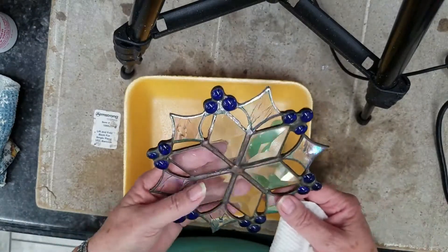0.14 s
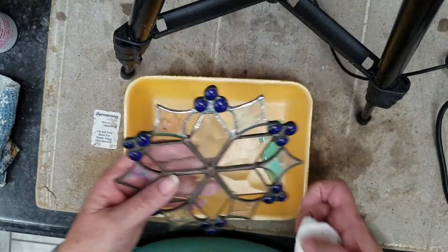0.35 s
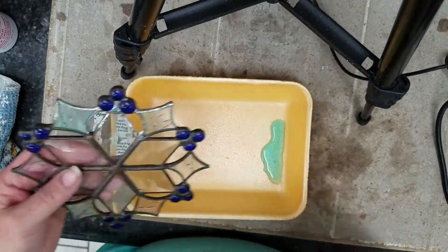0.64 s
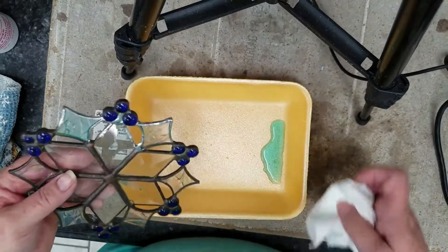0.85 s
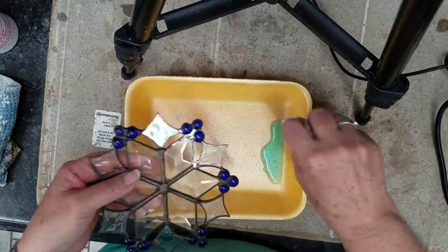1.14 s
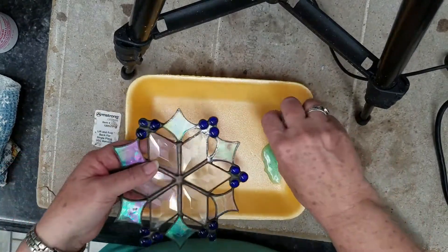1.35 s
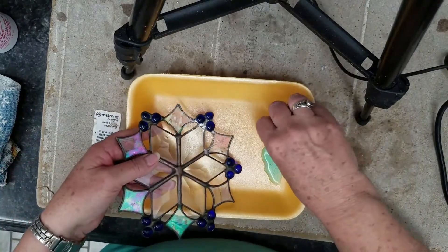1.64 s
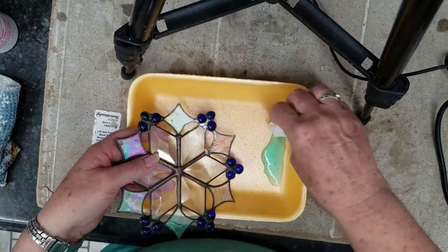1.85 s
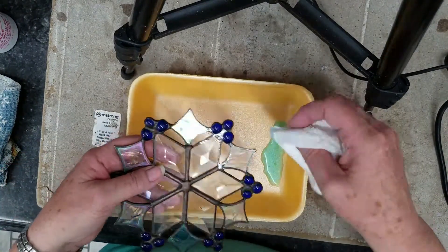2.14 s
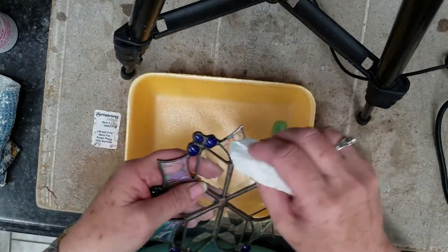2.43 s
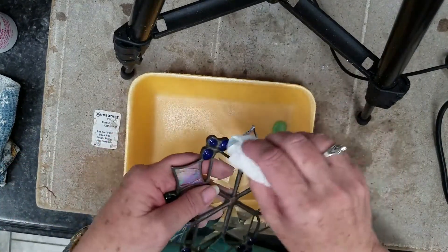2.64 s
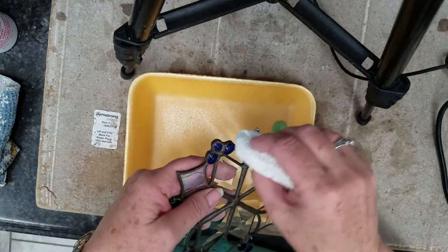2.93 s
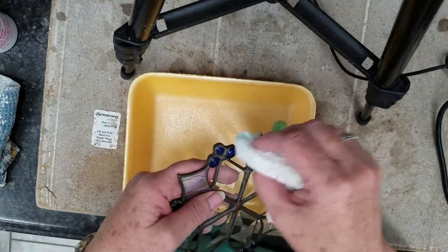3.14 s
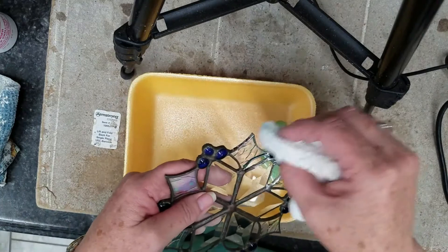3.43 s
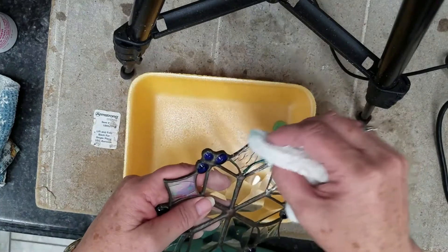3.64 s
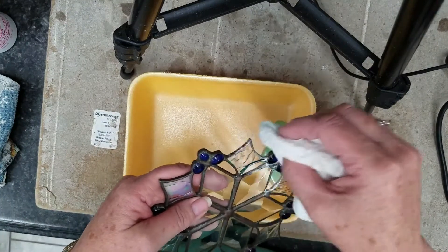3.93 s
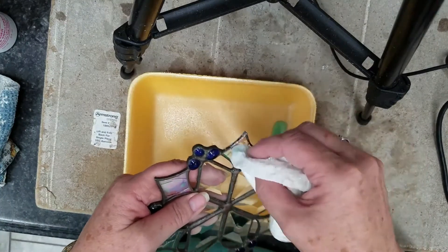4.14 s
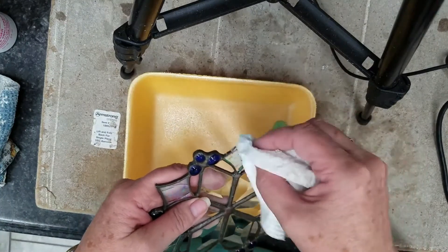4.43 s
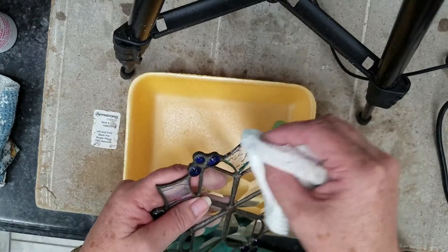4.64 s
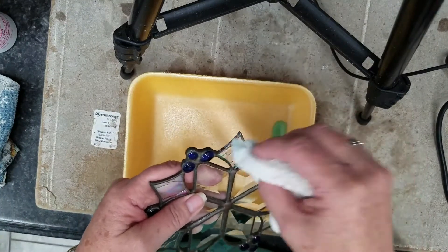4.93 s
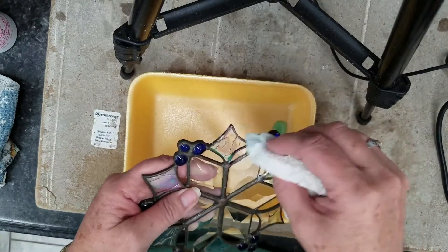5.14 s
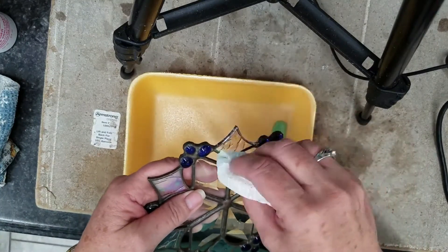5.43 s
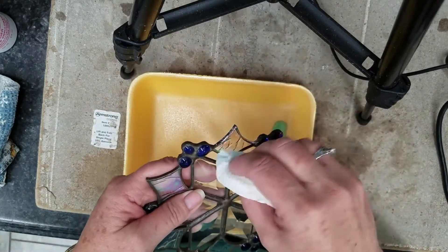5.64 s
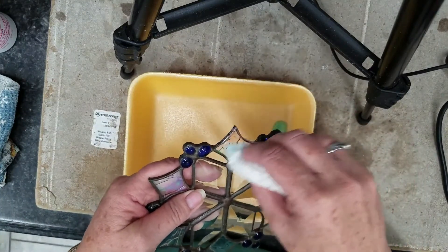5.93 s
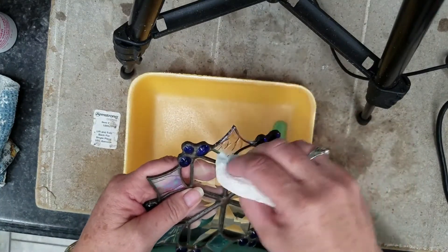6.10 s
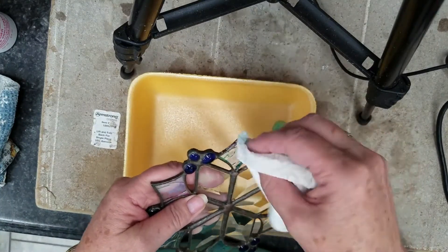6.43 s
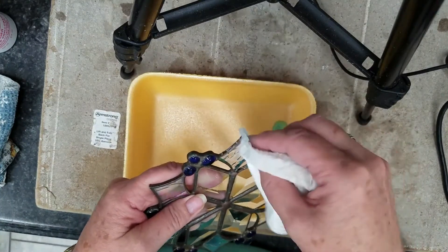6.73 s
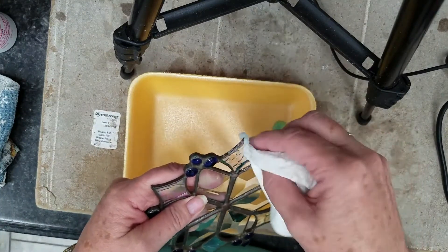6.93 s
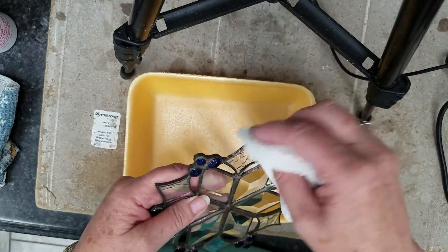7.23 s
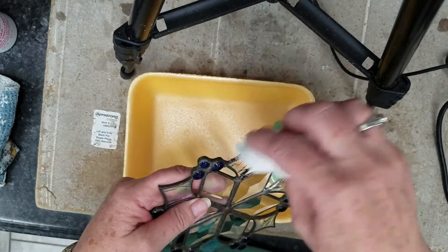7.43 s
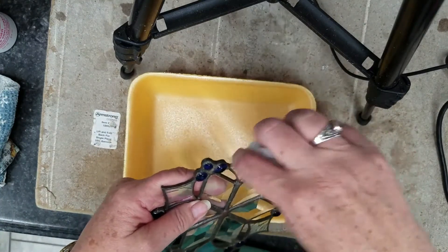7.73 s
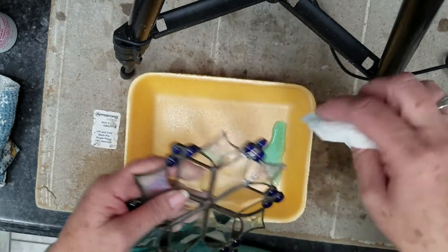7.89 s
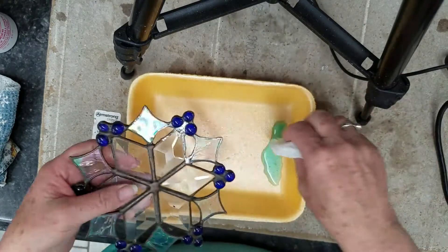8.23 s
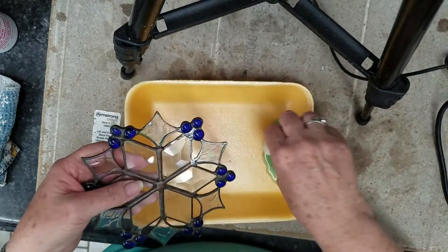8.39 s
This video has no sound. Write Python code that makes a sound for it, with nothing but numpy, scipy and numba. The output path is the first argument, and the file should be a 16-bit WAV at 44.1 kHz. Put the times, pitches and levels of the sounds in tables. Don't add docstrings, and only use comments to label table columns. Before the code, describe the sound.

A small quiet indoor workspace, heard very close in stereo, with a low steady fridge-like hum, slightly throbbing, and soft air hiss throughout. From 0 to 0.5 s there are light paper scuffs and small bumps; at 0.5-1.0 s the paper towel crumples with crisp crackling and a stronger scuff near 0.8. Between 1.1 and 2.0 s come the loudest moves: dry dabs and scrapes against a foam tray, sharp snaps and a hollow knock at 1.3, a bright crack at 1.84 and a dull bump at 2.0. It nearly quiets until 2.7. From 2.7 to 7.7 s, softer short scratchy rubs cross the leaded glass, irregular at first, quick and even around 5.2-6.0, with seam ticks and little knocks. After a brief lull, scuffs at 8.0 and 8.25 lead to a tight cluster of glassy ticks and a brighter paper scrape around 8.3-8.5.

```python
import sys
import numpy as np
from scipy import signal
from scipy.fft import rfft, irfft, next_fast_len
from scipy.io import wavfile
from scipy.ndimage import uniform_filter1d, map_coordinates
from numba import njit

SR = 44100
rng = np.random.default_rng(int(sys.argv[2]) if len(sys.argv) > 2 else 0)


def nominal_scale(level):
    x = np.asarray(level, float) / 20
    return 10 ** x


def bounce(signal):
    frames = np.transpose(np.atleast_2d(signal))
    limited = np.clip(frames, -1, 1)
    pcm = np.round(limited * 32767).astype(np.int16)
    wavfile.write(sys.argv[1], SR, pcm)


N = 377496
WIDE = next_fast_len(N, True)
TIME = np.arange(N) / SR
HZ = np.maximum(np.fft.rfftfreq(WIDE, 1 / SR), 1)


def along(table):
    hz, value = np.transpose(table)
    return np.interp(np.log(HZ), np.log(hz), value)


def unit(x):
    return x / np.sqrt(np.mean(x ** 2))


def lean_to(db):
    return nominal_scale(np.array([[db], [-db]]) / 2)


# f/Hz, correlation [0 to 1]
PORT_LIKENESS = [(60, 1), (130, 0.99), (290, 0.77), (640, 0.57), (1400, 0.15), (3100, 0.012), (6800, .01)]
# f/Hz, left minus right level/dB
PORT_LEAN = [(60, -7.5), (110, -1), (200, -2), (380, -1), (700, -3), (1290, -2.5), (2380, -1.5),
             (4400, -0.5), (8120, -0.5), (15000, 1.0)]


def ports(near, other, db):
    alike = np.clip(along(PORT_LIKENESS), 0, .999)
    mid = rfft(near, WIDE) * np.sqrt(1 + alike)
    side = rfft(other, WIDE) * np.sqrt(1 - alike)
    lean = along(PORT_LEAN) / 2
    left = (mid + side) * nominal_scale(db + lean)
    right = (mid - side) * nominal_scale(db - lean)
    return unit(irfft(np.array([left, right]), WIDE)[:, :N])


def walk(rate):
    k = int(SR / rate)
    steps = np.repeat(rng.standard_normal(N // k + 1), k)
    return 1.36 * uniform_filter1d(uniform_filter1d(steps, k), k)[:N]


@njit
def resonate(x, hz, width):
    y, band, low = np.empty(len(x)), 0., 0.
    for i in range(len(x)):
        g, k = np.tan(np.pi * hz[i] / SR), width / hz[i]
        v = (band + g * (x[i] - low)) / (1 + g * (g + k))
        band, low, y[i] = 2 * v - band, low + 2 * g * v, k * v
    return y


def slips(per_second, scatter_db):
    moment, luck, sign = rng.random((3, N))
    size = nominal_scale(-scatter_db * np.log(luck + .008))
    return unit((moment < per_second / SR) * size * np.sign(sign - .5))


def creases(count):
    out = np.zeros((2, N))
    r = np.exp(-np.pi * 350 / SR)
    for hz in np.geomspace(1490, 3630, count):
        pops = slips(350, 1.9) * nominal_scale(3.3 * walk(45))
        ring = unit(signal.lfilter([1, 0, -1], [1, -2 * r * np.cos(2 * np.pi * hz / SR), r * r], pops))
        lag = rng.integers(-2, 4)
        out += np.array([ring, np.roll(ring, lag)]) * min(1, 2800 / hz) ** 2.8
    return unit(out)


def mottle(x, patchy_db):
    patch_hz, patch_ms = 700, 35
    hz, t, z = signal.stft(x, SR, nperseg=256)
    field = rng.standard_normal((120, 900))
    row, column = np.minimum(hz / patch_hz, 119), np.minimum(1000 * t / patch_ms, 899)
    place = np.meshgrid(row, column, indexing="ij")
    z = z * nominal_scale(patchy_db * map_coordinates(field, place, order=1))
    return unit(signal.istft(z, SR, nperseg=256)[1][:, :N])


# peak t/s, slide t/ms, hiss level/dB, body level/dB
CATCHES = [(.778, 27, -47, -45.5), (.75, 20, -48, -56), (1.39, 8, -53, -61), (1.458, 8.9, -42.5, -44.5),
           (2.009, 36, -61.5, -74), (2.545, 14, -68, -68), (2.872, 19, -61.5, -62.5),
           (3.012, 21, -57, -57.5), (3.154, 33, -63.5, -69), (3.522, 13, -61.5, -64), (3.792, 13, -63, -64),
           (4.098, 69, -60, -59), (4.398, 15, -59, -61), (4.676, 98, -56, -58), (4.969, 71, -53.5, -55),
           (6.28, 12, -67, -76), (6.474, 60, -57, -55.5), (7.296, 45, -57, -56), (7.666, 20, -55, -58.5),
           (7.853, 20, -61, -80), (7.893, 42, -59.5, -61.5), (8.247, 120, -57, -57.5)]
# peak t/s, run-up t/ms, hiss level/dB, body level/dB
SWEEPS = [(.317, 27, -58.5, -52.5), (1.655, 69, -52, -50.5), (2.727, 58, -57.5, -57.5),
          (3.632, 60, -60, -60), (3.906, 42, -61, -60.5), (4.795, 31, -53.5, -54.5), (5.743, 38, -55, -56),
          (5.958, 28, -53.5, -55), (6.423, 49, -56.5, -55), (6.674, 47, -56, -57.5), (6.811, 24, -57, -58),
          (7.053, 130, -62.5, -61), (7.247, 24, -62.5, -62), (7.474, 18, -58.5, -59.5),
          (7.621, 12, -60.5, -60.5)]
# peak t/s, slide t/ms, hiss level/dB, body level/dB
JOLTS = [(1.153, 14, -50, -50.5), (1.314, 31, -46, -48), (1.446, 8, -46, -47.5), (4.111, 11, -56, -59),
         (5.374, 15, -69, -68), (5.396, 20, -60, -67), (5.591, 18, -60, -67), (6.034, 52, -55.5, -56.5),
         (8.004, 22, -58, -64), (8.231, 8, -59, -60), (8.321, 42, -50.5, -53)]
# peak t/s, half length t/ms, hiss level/dB, body level/dB
RUBS = [(.226, 25, -58, -55), (.945, 28, -50, -55.5), (1.062, 27, -58, -60.5), (1.214, 34, -48.5, -48.5),
        (1.839, 39.5, -47.5, -51), (2.257, 43, -69, -62.5), (2.38, 26, -64.5, -60.5),
        (3.264, 25, -56.5, -59.5), (4.495, 41, -60, -61), (5.21, 31.7, -55, -59),
        (5.305, 28.6, -58.5, -59.5), (5.417, 34, -57.5, -61), (5.522, 26, -52, -56.5),
        (5.616, 31, -56, -58.5), (5.85, 35, -57, -58), (6.916, 18.6, -52.5, -51), (8.404, 25, -45.5, -49.5),
        (8.518, 27, -56, -54.5), (.39, 31, -59, -55), (1.98, 20, -63, -72), (2.965, 28, -60.5, -68),
        (4.21, 19, -62.5, -68), (4.6, 35, -67, -67), (5.995, 33, -62, -70), (6.14, 12, -62, -63),
        (6.745, 30, -61, -61), (7.4, 27, -62.5, -65), (8.05, 30, -71, -75), (7.72, 34, -62.5, -61.5)]


def strokes():
    catch_ms, stop_ms, jolt_ms = 8.3, 17.3, 1.5
    rows = [(s, catch_ms, ms, *db) for s, ms, *db in CATCHES]
    rows += [(s, ms, stop_ms, *db) for s, ms, *db in SWEEPS]
    rows += [(s, jolt_ms, ms, *db) for s, ms, *db in JOLTS]
    rows += [(s, ms, ms, *db) for s, ms, *db in RUBS]
    return np.array(sorted(rows))


# t/s, level/dB
RUSTLE = [(0.0, -72.5), (.27, -76), (.53, -50), (.625, -53), (.75, -50), (.875, -54.5), (1.0, -73),
          (1.375, -49.5), (1.625, -58), (1.77, -57), (1.875, -75), (2.0, -62.5), (2.5, -71.5), (4.2, -73),
          (5.2, -82), (6.75, -71.5), (7.5, -67), (8.56, -75.5)]


def pressure(column):
    coarse = TIME[::32]
    rustle_db = np.interp(coarse, *np.transpose(RUSTLE)) + 0.16 * (column == 2)
    power = nominal_scale(2 * rustle_db)
    for row in strokes():
        lag_ms = 1000 * (coarse - row[0])
        swell = np.exp(-(lag_ms / np.where(lag_ms < 0, row[1], row[2])) ** 2)
        power += nominal_scale(2 * row[2 + column]) * swell
    return np.interp(TIME, coarse, np.sqrt(power))


# f/Hz, level/dB per Hz
PAPER_HISS = [(2500, -12.5), (4000, -4.5), (5200, -4.5), (7000, -7.5), (9000, -2.5), (12000, -1.5),
              (15500, -0.5), (17000, -0.5)]
# f/Hz, level/dB per Hz
PAPER_BODY = [(150, -39), (350, 0), (700, 4), (1000, 2), (1300, -5), (1700, -2), (2600, -1.5), (3600, -2),
              (4600, -10), (7000, -44)]
# f/Hz, width f/Hz, level/dB
GLASS_MODES = [(990, 38, 1), (1257, 116, 12), (1600, 42, 11), (2083, 63, 4), (2550, 37, -35),
               (3180, 87, -10)]


def towel():
    grip_db = 1.3 * walk(80)
    hiss = ports(slips(7000, 2.1), slips(7000, 2.4), along(PAPER_HISS))
    glass = sum(nominal_scale(db) / (1 + ((HZ - hz) / (width / 2)) ** 2) for hz, width, db in GLASS_MODES)
    body_db = along(PAPER_BODY) + 20 * np.log10(1 + 0.43 * glass)
    body = ports(slips(4000, 1.1), slips(4000, 2.0), body_db)
    peaks = strokes()[:, 0]
    dull = np.array([row for row in SNAPS + TAPS if row[2] < 2700], float)
    pitches = dull[np.abs(peaks[:, None] - dull[:, 0]).argmin(axis=1), 2]
    pocket_hz = pitches[np.searchsorted((peaks[1:] + peaks[:-1]) / 2, TIME)]
    pocket = np.array([resonate(side, pocket_hz, 350.) for side in body])
    body = unit(body + 0.57 * pocket + 0.63 * creases(count=11))
    hiss, body = mottle(hiss, patchy_db=2.8), mottle(body, patchy_db=2.1)
    hiss = hiss * pressure(1) * nominal_scale(1.0 + grip_db)
    return hiss + body * pressure(2) * nominal_scale(-2.26 + grip_db + 0.48 * walk(30))


MAINS_HZ, SHAFT_HZ = 59.985, 58.352
# t/s, level/dB
HUM_SWELL = [(0.0, -40.5), (.2, -45), (.55, -40), (.9, -43.5), (1.85, -41.5), (2.07, -45.5), (2.3, -40.5),
             (2.75, -44), (3.4, -42), (4.1, -40.5), (5.0, -42.5), (5.3, -41), (5.6, -45), (6.2, -42),
             (6.95, -43.5), (7.3, -39), (7.58, -45), (8.0, -40.5)]


def hum():
    late = TIME - 0.01057
    mains = nominal_scale(np.interp(TIME, *np.transpose(HUM_SWELL))) * np.cos(2 * np.pi * MAINS_HZ * late)
    shaft = nominal_scale(-72) * np.cos(2 * np.pi * SHAFT_HZ * late)
    return np.sqrt(2) * nominal_scale(np.array([[-2.2], [1.8]])) * (mains + shaft)


# multiple, level/dB, left minus right level/dB
MAINS_LINES = [(2, -58, -1), (3, -72.5, 6.5), (4, -78.5, -16.5)]
# multiple, level/dB, left minus right level/dB
SHAFT_LINES = [(2, -58.5, 0), (3, -77.5, -11), (4, -85, -1), (5, -74.5, 8.5), (6, -76, 0), (10, -78, -9)]


def motor():
    out = np.zeros((2, N // 8 + 2))
    slow = np.arange(out.shape[1]) * 8 / SR
    for hz, table, waver in ((MAINS_HZ, MAINS_LINES, .002), (SHAFT_HZ, SHAFT_LINES, .006)):
        turns = hz * (slow - .14283) + waver * np.interp(slow, TIME, walk(1.18))
        for multiple, db, pan_db in table:
            out += np.sqrt(2) * nominal_scale(db) * lean_to(pan_db) * np.cos(2 * np.pi * int(multiple) * turns)
    return signal.resample_poly(out, 8, 1, axis=1)[:, :N]


# f/Hz, level/dB per Hz
AIR = [(24, -9), (31, -14), (39, -16), (50, -1), (60, 4.5), (72, 1), (118, -3), (132, -16), (215, -20),
       (580, -20), (620, -22), (2000, -28.5), (3500, -34.5), (7500, -45.5), (16000, -32.5)]
# f/Hz, width f/Hz, level/dB
ROOM_MODES = [(163.2, 36.4, 14), (178, 45, 2.5), (234, 28, 5.5), (299.5, 49, 7.5), (364.2, 5.9, 10),
              (455, 14.6, 9), (531, 24, 10), (840, 60, 4.5), (946, 43, 4)]


def air():
    modes_db = sum(db / (1 + ((HZ - hz) / (width / 2)) ** 2) for hz, width, db in ROOM_MODES)
    return nominal_scale(-50.5) * ports(rng.standard_normal(N), rng.standard_normal(N), along(AIR) + modes_db)


# t/s, peak level/dB, centre f/Hz
SNAPS = [(0.31, -47, 2500), (.36, -49, 2200), (.426, -38, 1200), (1.154, -47, 6000), (1.314, -34, 2230),
         (1.319, -36, 2400), (1.446, -45, 5060), (1.653, -36, 3000), (1.705, -53, 8000), (1.803, -46, 9020),
         (3.005, -38, 1600), (3.018, -42, 4000), (3.155, -56, 7000), (3.253, -38.5, 5000),
         (3.267, -39.5, 1300), (4.473, -44, 2900), (4.968, -40.5, 6000), (5.374, -56, 6000),
         (6.279, -53, 8000), (6.911, -53, 1310), (7.668, -46, 7000), (8.004, -47, 7000),
         (8.321, -34, 12500)]
# t/s, peak level/dB, centre f/Hz
TAPS = [(.505, -41, 1700), (.534, -44, 750), (.624, -43, 1460), (1.2, -39.5, 1800), (1.54, -41, 2340),
        (4.111, -41.5, 4800), (4.79, -48, 2100), (5.193, -46, 1640), (5.519, -42, 1730),
        (5.735, -41.5, 1570), (5.96, -44, 1660), (6.075, -45, 1800), (7.852, -50, 6500), (7.981, -48, 2200),
        (8.337, -52, 1700), (8.352, -43, 2900), (8.368, -42.5, 2550), (8.381, -43, 3160),
        (8.392, -38, 2550), (8.41, -43, 1950), (8.388, -41, 2000), (8.421, -40, 1570), (8.395, -48, 1050),
        (8.425, -46, 1000), (8.42, -45, 3300), (8.434, -44, 2000), (2.006, -48, 2050), (2.011, -49, 2100),
        (4.112, -43.5, 3500), (3.902, -49, 1900), (1.321, -40, 3000), (1.36, -46, 3200), (.702, -43, 2200),
        (1.604, -45, 2250), (1.62, -46, 2000), (1.748, -46, 2280), (4.024, -55, 2200), (4.754, -50, 1700),
        (4.797, -52, 5900), (6.963, -53, 2200), (6.995, -53, 2200), (7.73, -51, 2950), (7.947, -54, 2100),
        (7.89, -52, 2150), (.312, -46, 2200), (1.5, -47, 2700), (1.81, -46, 2100), (1.857, -46, 2400),
        (8.325, -49, 3400), (8.33, -48, 2000), (8.437, -48, 3200), (.725, -41, 2100), (.66, -43, 3200),
        (1.453, -36, 1420), (4.113, -47, 1600), (4.775, -46, 2950), (.78, -42, 1560), (5.235, -48.5, 2200),
        (6.663, -42, 3800), (3.268, -45, 855), (3.013, -44.5, 1660)]
# t/s, peak level/dB, centre f/Hz
FINGER_RING = [
    (8.004, -51, 11800),
    (8.014, -52, 11830),
    (8.03, -57, 11800),
    (8.392, -48, 12000),
    (8.321, -44, 15000),
    (8.335, -48, 15050),
    (8.348, -46, 14950),
    (8.321, -46, 12000),
]
# t/s, peak level/dB, centre f/Hz
CRACKS = [(0.74, -39, 1600), (1.2, -39, 1200), (1.323, -39, 2000), (1.5, -42, 1200), (3.005, -43, 900),
          (3.023, -42, 550), (1.8365, -32, 3000), (1.8375, -30, 10000), (1.315, -38, 1400),
          (3.004, -42, 3000), (4.11, -44, 6000), (3.628, -43, 2000), (3.628, -50, 10000),
          (3.262, -44, 1400), (1.86, -44, 10000), (1.871, -36, 10000), (2.007, -47, 1450),
          (3.628, -37, 830), (3.901, -44, 1000), (3.908, -43, 810), (.589, -36, 1800), (1.155, -40, 11000),
          (1.144, -48, 11000), (2.976, -50, 11500), (1.805, -42, 11000), (1.826, -43, 11000),
          (1.304, -45, 9000), (1.578, -46, 10000), (5.905, -55, 6000), (6.035, -48, 11000),
          (4.097, -49, 1600), (8.247, -39, 2300), (8.251, -42, 1500), (8.0035, -42, 11000),
          (8.014, -48, 13000), (8.324, -46, 5000), (1.897, -46, 12000), (3.8, -43, 2500),
          (8.298, -48, 2000), (8.231, -50.5, 2800), (0.68, -42, 1000), (6.3, -49, 1800), (3.2, -48, 2200),
          (5.9, -49, 1500), (4.3, -46, 1600), (6.461, -50, 1700), (6.893, -52, 1500), (5, -49, 1400),
          (0.17, -53, 1700)]


def ticks():
    out, t = np.zeros((2, N)), TIME[:3000]
    kinds = (SNAPS, 0.53, 0.33), (TAPS, 0.099, 0.68), (FINGER_RING, 0.006, .23), (CRACKS, 0.84, 0.14)
    for table, share, tail in kinds:
        fade = np.exp(-t / 0.00045) + tail * np.exp(-t / 0.011)
        for s, db, hz in table:
            pan_db = rng.standard_normal()
            grit = rng.standard_normal((3, len(t)))
            grit[:, 0] = 2.5
            crack = (0.74 * grit[0] + 0.76 * grit[1:]) * fade
            centre = np.full(len(t), float(hz))
            crack = np.array([resonate(side, centre, float(share * hz)) for side in crack])
            i = int(s * SR)
            out[:, i:i + len(t)] += crack / np.abs(crack).max() * nominal_scale(db - 2.5) * lean_to(pan_db)
    return out


# t/s, peak level/dB, main mode f/Hz, t60 t/s
KNOCKS = [(0.423, -49, 427, 0.048), (.455, -42.5, 380, 0.027), (0.766, -42, 990, 0.07),
          (.775, -43, 1080, 0.057), (1.3135, -33.5, 190.7, 0.11), (1.3135, -35.5, 505, 0.07),
          (1.3135, -46, 950, .04), (1.315, -38, 390, 0.045), (1.33, -50, 860, .06), (1.645, -46, 330, .07),
          (1.514, -51, 550, .05), (1.462, -50, 300, .09), (1.154, -50, 900, .04), (.216, -51, 900, .05),
          (.295, -50, 900, .03), (4.566, -56, 1000, .04), (6.41, -50, 400, .05), (5.735, -51, 400, .04),
          (1.321, -44, 293, 0.15), (1.646, -52, 916, 0.11), (1.834, -39, 900, 0.034),
          (2.016, -36.5, 479, 0.13), (2.008, -42, 1250, 0.047), (2.008, -49, 950, .04),
          (2.03, -52, 830, .05), (2.033, -55, 1200, .15), (2.046, -47, 120, .25), (2.403, -51, 300, 0.095),
          (2.71, -44, 412, 0.03), (3.012, -47.5, 463, 0.12), (3.265, -51.5, 920, 0.041),
          (3.627, -45.5, 458, 0.08), (3.627, -41, 900, .04), (1.321, -40, 540, .06), (3.627, -47, 330, .05),
          (3.9, -50, 200, .08), (1.15, -52, 500, .05), (3.64, -51, 706, .07), (3.901, -44, 1090, 0.033),
          (3.007, -50, 890, 0.037), (3.262, -50, 500, .04), (2.03, -48, 150, .12), (3.9, -41.5, 414, 0.033),
          (4.95, -51, 293, 0.037), (5.625, -47, 338, 0.09), (6.907, -57, 506, 0.076),
          (7.653, -39.5, 405, 0.011), (7.732, -48, 350, 0.026)]


def knocks():
    out, t = np.zeros(N), TIME[:9000]
    bent = t - 0.054 * 0.018 * (1 - np.exp(-t / 0.024))
    thud_hz = 0 * t + 1000.0
    for s, db, hz, t60 in KNOCKS:
        fade = np.exp(-np.log(1000) * t / t60)
        ring = np.sin(2 * np.pi * hz * bent) + 0.29 * np.sin(2 * np.pi * .88 * hz * t)
        ring += 0.13 * fade * np.sin(2 * np.pi * 2.9 * hz * t)
        thud = resonate(rng.standard_normal(len(t)), thud_hz, 860.0)
        thud = unit(resonate(thud, thud_hz, 860.0)) * np.exp(-t / 0.0065)
        i = int(s * SR)
        out[i:i + len(t)] -= nominal_scale(db + 2.5) * (ring * fade * (1 - np.exp(-t / 0.0015)) + 0.19 * thud)
    return np.array([np.roll(out, 14) * nominal_scale(-2.2), out * nominal_scale(1.6)])


def room(x, t60=0.2, wet_db=-16.0):
    t = TIME[:16000]
    tail = rng.standard_normal((2, len(t))) * np.exp(-np.log(1000) * t / t60) * (t > .003)
    tail = signal.lfilter([1], [1, -.55], tail)
    tail = tail / np.sqrt(np.sum(tail ** 2) / 2)
    return x + nominal_scale(wet_db) * signal.fftconvolve(x, tail, axes=1)[:, :N]


def scene():
    rubbing = room(towel(), t60=0.05, wet_db=-9.0) * nominal_scale(-0.6)
    return rubbing + hum() + motor() + air() + room(ticks() + knocks())


def band_limit(x):
    return signal.sosfilt(signal.butter(12, 16730, fs=SR, output="sos"), x)


def record(dry):
    cut = irfft(rfft(dry, WIDE) * (HZ < 15810), WIDE)[:, :N]
    return band_limit(cut - .0007)


dry = scene()
out = record(dry)
bounce(out)
```